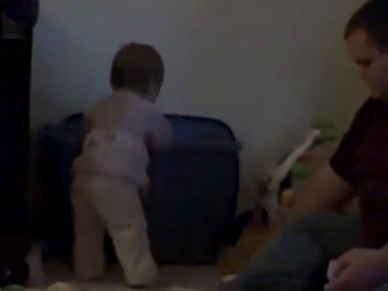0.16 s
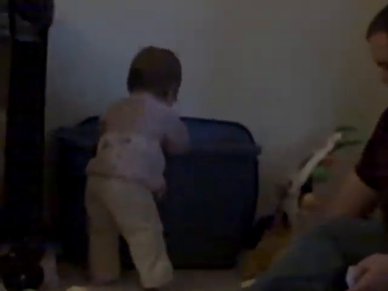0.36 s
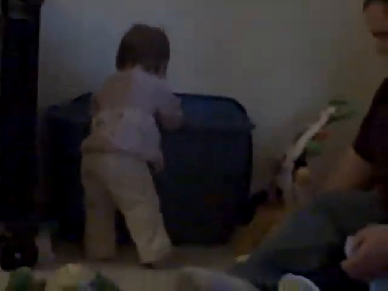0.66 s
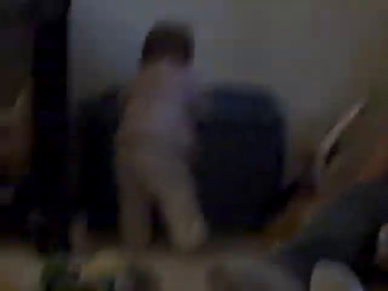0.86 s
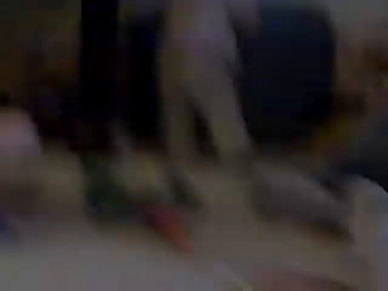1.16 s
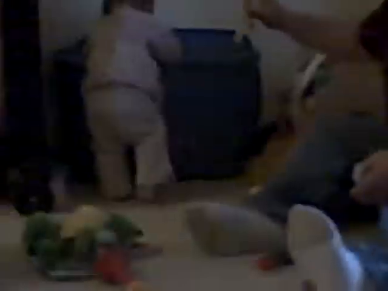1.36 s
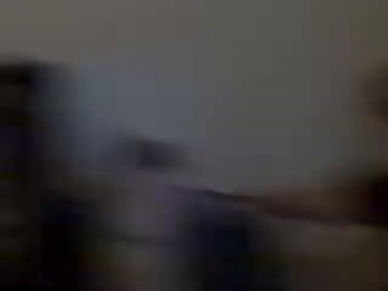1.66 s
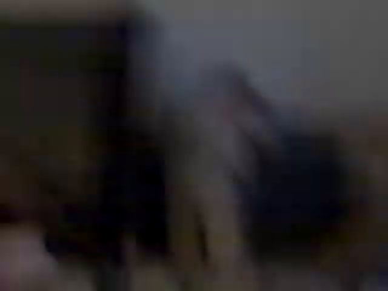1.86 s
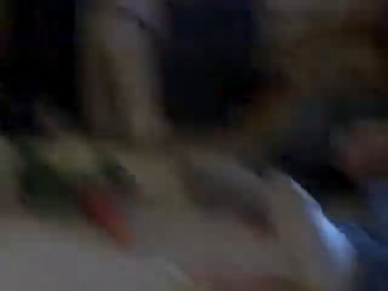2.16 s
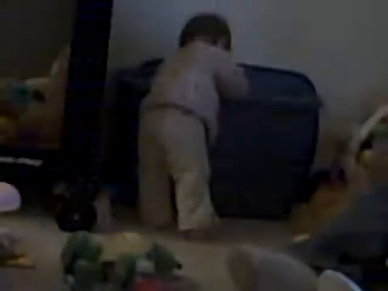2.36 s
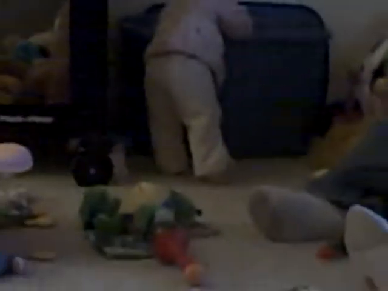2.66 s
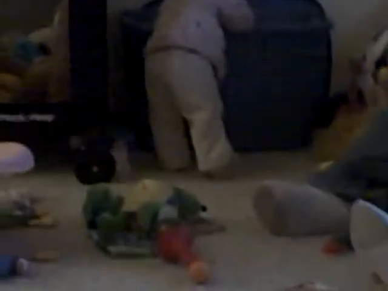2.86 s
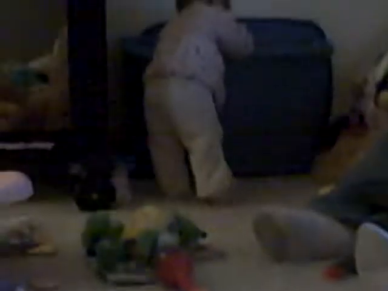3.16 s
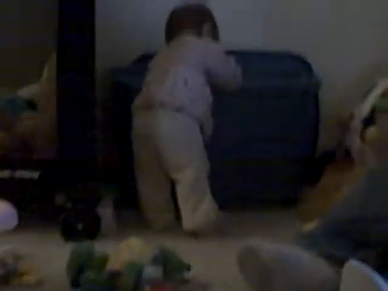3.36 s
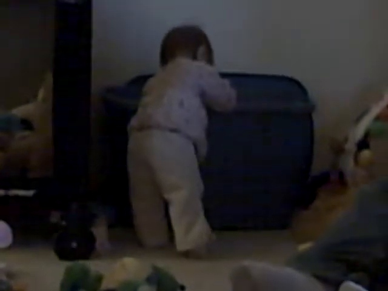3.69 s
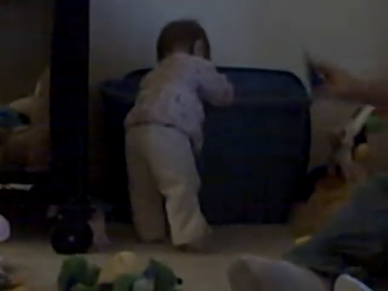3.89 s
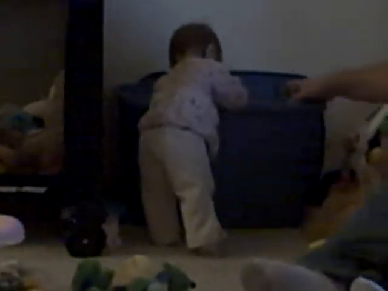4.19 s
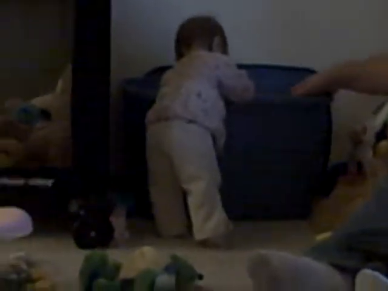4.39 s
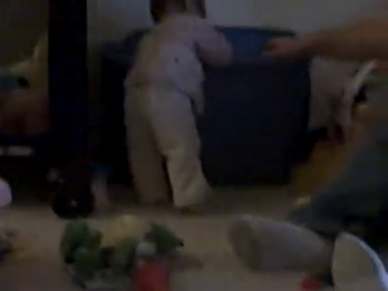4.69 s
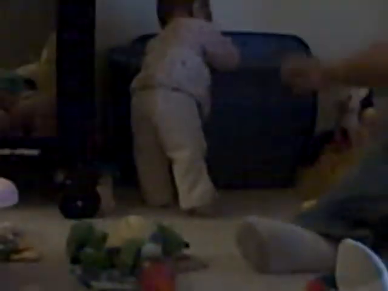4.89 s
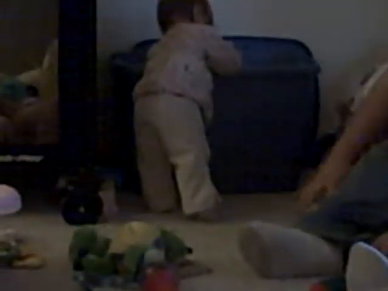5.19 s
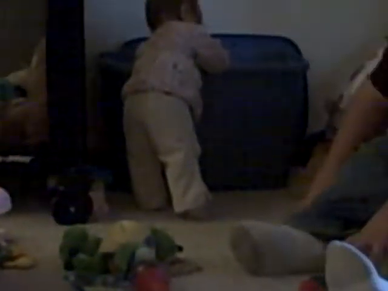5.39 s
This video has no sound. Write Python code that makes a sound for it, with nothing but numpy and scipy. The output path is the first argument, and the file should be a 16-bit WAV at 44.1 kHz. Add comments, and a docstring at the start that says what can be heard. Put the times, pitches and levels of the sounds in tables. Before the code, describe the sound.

Hard plastic toys knock and clatter in a big hollow plastic bin in bursts, with handling ticks, in a quiet humming living room.

```python
"""Hard plastic toys knock and tinkle as they are pushed about and dropped into a big plastic bin.
Each knock is a short rattle of contacts that rings a toy; a soft push makes the bin walls boom.
Small parts ring high and thin; rough held tones make squeaks and one hollow bong; fingers tick on the
hand-held recorder. Hands rustle as shaped noise; a quiet carpeted living room adds short echoes.
Mains hum, two thin whines and microphone hiss lie underneath."""
import sys
import numpy as np
from scipy import signal
from scipy.fft import rfft, irfft
from scipy.io import wavfile
from scipy.ndimage import uniform_filter1d

SR = 44100
rng = np.random.default_rng(int(sys.argv[2]) if len(sys.argv) > 2 else 0)


def master_out(mix):
    """Clip the mix to full scale and print it as 16-bit PCM to the path in sys.argv[1]."""
    frames = np.transpose(np.atleast_2d(mix))
    ceiling = np.clip(frames, -1, 1)
    pcm = np.round(ceiling * 32767).astype(np.int16)
    wavfile.write(sys.argv[1], SR, pcm)


def voltage_ratio(level):
    """Linear amplitude factor for a level in decibels (scalar or array-like)."""
    return 10 ** (np.asarray(level, float) / 20)


N = 244314  # samples
T = np.arange(N) / SR  # s

# Source levels are set ahead of the tone shaping and the room.
# toy knocks: t/s, level/dB, treble over that level/dB, ring f/Hz, rattle decay/s
TOY_KNOCKS = [(0.021, -46.5, 13.5, 2920, 0.008), (0.057, -46.5, 8, 3200, 0.058),
              (0.081, -33, -20, 1340, 0.0076), (0.202, -46, 6, 4830, 0.018),
              (0.219, -35.5, -24, 644, 0.021), (0.424, -41, -14, 1190, 0.0016),
              (0.44, -66, 20, 3360, 0.0059), (0.458, -39, -8, 1240, 0.0064), (0.489, -41, -19, 1770, 0.004),
              (1.76, -37.5, 9.5, 5150, 0.0078), (1.77, -22, -3.5, 766, 0.025),
              (1.774, -23.5, 2, 2150, 0.0048), (1.798, -23, 0, 765, 0.025), (1.825, -27.5, -1, 575, 0.013),
              (1.964, -34, -25.5, 1000, 0.018), (1.981, -32.5, 8.5, 4440, 0.026), (2, -29, 10, 5400, 0.011),
              (2.036, -30, 6.5, 657, 0.033), (2.065, -23.5, -21, 846, 0.0055),
              (2.089, -28, -2.5, 760, 0.014), (2.12, -29.5, 3.5, 866, 0.01),
              (2.2417, -30, -6, 1650, 0.0054), (2.25, -29, -8, 653, 0.012), (2.271, -41, -23, 1550, 0.0071),
              (2.284, -28.5, -5, 1680, 0.0033), (2.289, -26, -8, 710, 0.011),
              (2.339, -27, -11.5, 996, 0.013), (2.375, -39, -24, 1180, 0.011),
              (2.405, -44.5, -1, 730, 0.014), (2.484, -40.5, -10.5, 780, 0.0091),
              (2.534, -41.5, -9.5, 934, 0.036), (2.61, -43.5, -10, 804, 0.017),
              (2.803, -51, -28, 964, 0.0074), (3.049, -41.5, -26, 947, 0.0094),
              (4.203, -58.5, -1, 1350, 0.015), (4.46, -49, -6, 1770, 0.01),
              (4.524, -38.5, 1.5, 1140, 0.015), (4.554, -51.5, 17, 6300, 0.007),
              (4.595, -34.5, -20, 1900, 0.002), (5.301, -31.5, -19, 590, 0.0032),
              (5.306, -39.5, -3, 1620, 0.0038), (5.315, -36, -30, 727, 0.008),
              (5.33, -42.5, -27, 940, 0.0086), (5.383, -52, 0.5, 700, 0.015)]
# small parts and lightly knocked toys ringing out: t/s, level/dB, f/Hz
LONE_RINGS = [(0.02, -24, 12100), (.022, -29, 15200), (.052, -45, 3590), (.06, -42, 3230),
              (.075, -38.5, 12700), (0.128, -36.5, 10060), (.13, -47, 3650), (.15, -33, 7720),
              (.15, -38, 15100), (.205, -36, 7830), (0.235, -43, 11170), (.265, -41, 7650),
              (0.444, -46, 5540), (.445, -44.5, 3180), (.477, -45.5, 1206), (3.15, -46, 1256),
              (.085, -39, 1970), (1.761, -27.5, 4890), (1.797, -22, 3270), (1.85, -32, 3170),
              (2.007, -27, 3904), (4.535, -41.5, 6460), (.151, -43, 13000), (.205, -41, 15000)]
# blows on the toy that is dropped in: t/s, level/dB, rattle decay/s
DROP_BLOWS = [(4.593, -31, 0.064), (4.622, -38, 0.0016), (4.642, -17, 0.012), (4.648, -19.5, 0.024),
              (4.669, -31, 0.011), (4.71, -29.5, 0.024), (4.769, -36, 0.028)]
# modes of the dropped toy, before blow strength tilts them: f/Hz, level/dB, t60/s
DROPPED_MODES = [(1010, -10.5, 0.2), (1042, -9.5, 0.19), (1775, -21, 0.34), (2048, -15.5, 0.34),
                 (2342, -15.5, 0.66), (3385, -7.5, 0.075), (3970, -22, 0.33), (4334, -32, 0.27),
                 (4970, -26, 0.22), (5300, -25, 0.2), (5400, -13, 0.17), (6220, -9, 0.17),
                 (7900, -25, 0.15), (9070, -19, 0.14), (10400, -15, 0.11)]
# blows on the hollow toy: t/s, level/dB, rattle decay/s
HOLLOW_BLOWS = [(2.93, -30, 0.012), (2.946, -29.5, 0.0058), (2.958, -33, 0.0049)]
# modes of the hollow toy, before blow strength tilts them: f/Hz, level/dB, t60/s
HOLLOW_MODES = [(617, -17, 0.11), (1120, -14, 0.091), (1147, -9.5, 0.13), (1185, 0.5, 0.22),
                (1706, -12.5, 0.043), (2335, -1, 0.029), (2670, -7, 0.018), (3560, -8, 0.042),
                (3950, -7, .03), (5200, -5, 0.029), (5860, -10, .02)]
# pushes on the bin: t/s, level/dB, nearest wall f/Hz, its t60/s (hands and toys damp it)
BIN_PUSHES = [(.009, -37, 172, 0.028), (0.076, -28.5, 212, 0.024), (0.217, -32, 217, 0.018),
              (1.796, -21, 280, 0.084), (1.819, -21.5, 169, 0.066), (1.964, -29, 262, 0.079),
              (2.033, -29, 148.5, 0.1), (2.049, -41, 88, 0.11), (2.064, -30, 155.3, 0.085),
              (2.095, -31, 211, 0.056), (2.2425, -25, 229, 0.011), (2.289, -38.5, 233, 0.12),
              (2.349, -39.5, 212, 0.16), (2.532, -36.5, 241, 0.044), (2.795, -49, 166, 0.068),
              (3.046, -46, 220, 0.047), (4.463, -42, 290, 0.025), (4.593, -31.5, 251, 0.032),
              (4.644, -24, 160, 0.095), (4.66, -31, 93.5, 0.11), (4.753, -31.5, 151, 0.098),
              (5.036, -40.5, 273, 0.075), (5.039, -42.5, 96, 0.074), (5.146, -37.5, 276, 0.093),
              (5.299, -25, 237, 0.007), (5.32, -41, 232, 0.07), (5.362, -53, 264, 0.12)]
# balance of the other bin walls: f/Hz, level/dB, t60/s
WALL_MODES = [(98, -14, 0.15), (133, 5.5, 0.024), (160, -2, 0.45), (212, 10.5, 0.053), (279, 4.5, 0.13),
              (346, 1, 0.074)]
# held tones, rubbed toys that squeak and one hollow bong of a bin wall:
# t/s, length/s, tone level/dB, start f/Hz, end f/Hz
HELD_TONES = [(0.156, 0.15, -60, 2870, 2850), (0.247, 0.1, -54, 881, 876), (0.356, 0.067, -46.5, 870, 877),
              (0.485, 0.063, -33.5, 212, 200), (1.6, 0.08, -58, 995, 1205), (3.054, 0.065, -58, 934, 796),
              (3.108, 0.053, -57, 850, 1323)]
# fingers on the recorder case: t/s, level/dB, treble and thud relative to it/dB, ring f/Hz
FINGER_TICKS = [(0.659, -39, -37, -27, 800), (0.824, -23.5, -1.5, -27, 1500), (1.022, -41, -3.5, -11, 1010),
                (1.081, -44, -16, -18, 1040), (1.097, -37, -8, -4.5, 970), (1.135, -42.5, -12, 1, 950),
                (1.165, -48, 1.5, -5, 1150), (1.192, -44, -20, -6, 940), (1.216, -38.5, -27, -5, 1220),
                (1.28, -39, 8.5, -3, 715), (1.542, -45, 3.5, 0, 1900), (1.649, -41, -8.5, -5, 1020),
                (1.683, -39, -3.5, -9, 700), (2.202, -46, 22.5, -19, 4200), (2.218, -43, 21.5, -23, 4000)]
# modes of the recorder case, before tap strength shifts them: f/Hz, level/dB, t60/s
CASE_MODES = [(555, -16, 0.03), (870, -3, 0.019), (2240, -11, .01), (3530, -8.5, 0.0083), (8200, -15, .008)]
# hands moving among the toys: t/s, level/dB
HAND_LEVEL = [(0, -57), (.3, -62), (.55, -63.5), (.95, -63.5), (1.1, -68.5), (1.42, -77), (1.74, -69),
              (1.95, -55), (2.2, -53.5), (2.45, -63.5), (2.7, -70.5), (3.05, -65), (3.5, -75), (4.44, -75),
              (4.51, -62), (4.7, -43), (4.86, -66.5), (5.02, -69), (5.25, -63.5), (5.54, -68.5)]
# cloth and sleeves brushing past: centre t/s, middle level/dB, treble level/dB, fall/(dB per s)
CLOTH_BRUSHES = [(.24, -87, -55, 120), (1.277, -69.5, -53.5, 101), (1.54, -86, -65, 350),
                 (1.73, -88, -57.5, 170), (2.2, -72, -57, 97), (3.129, -58, -67, 179),
                 (4.556, -77, -46, 418)]
# tone curve of brushed cloth: f/Hz, level/dB
CLOTH_TONE = [(2000, -29), (4000, -0.5), (8500, 1), (11500, 1), (15500, 4)]
# echo decay of the room: f/Hz, t60/s
ROOM_DECAY = [(125, 0.39), (500, 0.3), (2000, 0.27), (6000, 0.28), (14000, 0.087)]
# tone curve of room air and hiss: f/Hz, relative level/dB
AIR_TONE = [(15, -8), (25, -3), (70, -6.5), (121, -3.5), (142, -12), (167, -8.5), (457, -32.5), (2210, -28),
            (8600, -33), (15650, -35), (15900, -60)]
# thin whines, before they flicker: f/Hz, level/dB
WHINE_TONES = [(11230, -83.5), (15272, -85)]


def unit(x):
    """Scale to rms 1."""
    return x / np.sqrt(np.mean(x ** 2))


def peak(x, db):
    """Scale to a peak level in dB."""
    return x * voltage_ratio(db) / np.max(np.abs(x))


def colour(x, points):
    """Filter by (Hz, dB) points joined on a log frequency axis."""
    hz, db = np.transpose(points)
    f = np.maximum(np.fft.rfftfreq(len(x), 1 / SR), 1)
    gain = voltage_ratio(np.interp(np.log(f), np.log(hz), db))
    return irfft(rfft(x) * gain, len(x))


def add(out, s, *parts):
    """Mix sounds in at time s."""
    i = int(s * SR)
    for x in parts:
        out[i:i + len(x)] += x[:N - i]


def rattle(decay_s, size=16384):
    """A burst of uneven tiny contacts that builds up quickly and dies away."""
    t = np.arange(size) / SR / max(decay_s, .0005)
    unevenness_db = 3.4 * np.repeat(rng.standard_normal(size // 32), 32)
    contacts = rng.standard_normal(size) * voltage_ratio(unevenness_db)
    return contacts * np.exp(-t) * (1 - np.exp(-t / 0.26))


def crack(burst, treble_db, middle_db=0):
    """The broadband part of a knock: a middle and a treble band with their own random peaks and dips."""
    patches_db = 2.2 * rng.standard_normal(48)
    burst = colour(burst, list(zip(np.geomspace(400, 16000, num=48), patches_db)))
    middle = colour(burst, [(150, 9.5), (450, -1.5), (1200, 11.5), (2500, 4.5), (5000, -21.0)])
    treble = colour(burst, [(1800, -18), (3500, 7.5), (8000, 5.0), (16000, -4)])
    return (peak(middle, middle_db) + peak(treble, treble_db))[:len(burst) * 3 // 4]


def ring(x, hz, t60):
    """One decaying mode struck by x: a complex one-pole resonator."""
    pole = np.exp(2j * np.pi * hz / SR - np.log(1000) / (max(t60, .004) * SR))
    return signal.lfilter([1], [1, -pole], x).imag


def rough_ring(burst, hz, t60, db):
    """A close pair of modes that beat against each other; the upper one dies sooner."""
    lower = peak(ring(burst, hz, t60), 0)
    upper = peak(ring(burst, hz * 1.008 + 20, t60 * 0.49), -0.71)
    return peak(lower + upper, db)


def knocks():
    """Every knock cracks and rings its own toy in one short mode pair."""
    toy_t60_s, ring_under_peak_db = 0.021, -3
    out = np.zeros(N)
    for s, db, treble_db, hz, decay_s in TOY_KNOCKS:
        burst = rattle(decay_s)
        tone = rough_ring(burst, hz, toy_t60_s, db + ring_under_peak_db)
        add(out, s, voltage_ratio(db) * crack(burst, treble_db), tone)
    return out


def tinkles():
    """Small parts and lightly knocked toys ring on after a brief rattle; high ones die away sooner."""
    t60_at_1khz_s, t60_slope = 0.2, -0.97  # the slope is an exponent over pitch
    out = np.zeros(N)
    for s, db, hz in LONE_RINGS:
        t60 = t60_at_1khz_s * (hz / 1000) ** t60_slope
        add(out, s, rough_ring(rattle(0.0073), hz, t60, db))
    return out


def strike(blows, modes, crack_db, treble_db):
    """Blows on one toy ring all its modes, duller when struck softly."""
    out = np.zeros(N)
    for s, db, decay_s in blows:
        burst = rattle(decay_s)
        tilt_db = 0.17 * db  # per octave above 1 kHz
        rings = sum(rough_ring(burst, hz, t60, g + tilt_db * np.log2(hz / 1000)) for hz, g, t60 in modes)
        add(out, s, voltage_ratio(db) * rings, voltage_ratio(db) * crack(burst, treble_db + .5 * db, crack_db))
    return out


def toys():
    """Knocks, tinkles and two many-moded toys, with the bass filtered out."""
    dropped = strike(DROP_BLOWS, DROPPED_MODES, crack_db=-5, treble_db=14)
    hollow = strike(HOLLOW_BLOWS, HOLLOW_MODES, crack_db=-28, treble_db=16)
    return colour(knocks() + tinkles() + dropped + hollow, [(100, -23.0), (300, -0.5)])


def bin_walls():
    """A soft push swings the nearest wall and stirs all the others."""
    push_s = 0.0109
    others_db, others_slope_db = -2, 2.5  # at a nearest-wall t60 of 0.1 s; per doubling of it
    out, t = np.zeros(N), np.arange(16384) / SR
    for s, db, hz, t60 in BIN_PUSHES:
        push = np.sin(2 * np.pi * hz * t) * (t < push_s)
        nearest = peak(ring(push, hz, t60), db)
        others = sum(peak(ring(rattle(0.013), f, d), g) for f, g, d in WALL_MODES)
        stirred_db = db + others_db + others_slope_db * np.log2(10 * t60)
        add(out, s, nearest + peak(others, stirred_db))
    return colour(out, [(30, -41), (75, -4.0), (120, -2.5), (400, -3.5), (1500, -15)])


def held_tone(length_s, start_hz, end_hz):
    """One gliding tone, roughened by slow random judder in and out of phase with it."""
    attack_s, release_s, roughness = 0.0018, 0.026, 0.46
    judder_cycles = 3.5  # smoothing, in cycles of the start pitch
    t = np.arange(8192) / SR
    shape = np.clip(np.minimum(t / attack_s, (length_s - t) / release_s), 0, 1)
    hz = np.interp(t, [0, length_s], [start_hz, end_hz])
    phase = 2 * np.pi * np.cumsum(hz) / SR
    noise = rng.standard_normal((2, len(t)))
    judder = roughness * unit(uniform_filter1d(noise, int(judder_cycles * SR / start_hz)))
    return shape * ((1 + judder[0]) * np.sin(phase) + judder[1] * np.cos(phase))


def held_tones():
    """Held tones: rubbed toys squeak, and one hollow bong of a bin wall."""
    out = np.zeros(N)
    for s, length_s, db, start_hz, end_hz in HELD_TONES:
        add(out, s, voltage_ratio(db) * held_tone(length_s, start_hz, end_hz))
    return out


def fingers():
    """Dry ticks and thuds carried by the case to the microphone; firm taps wake more of its modes."""
    out, t = np.zeros(N), np.arange(4096) / SR
    for s, db, treble_db, thud_db, hz in FINGER_TICKS:
        burst = rattle(0.0018, size=4096)
        thud = -np.sin(2 * np.pi * 70 * t) * np.exp(-t / 0.0019)
        firmness_db = 0.69 * (db + 16.5)
        case = sum(peak(ring(burst, f, d), g + firmness_db) for f, g, d in CASE_MODES)
        tick = voltage_ratio(db) * (crack(burst, treble_db, -4) + case[:3072])
        add(out, s, tick, peak(ring(burst, hz, 0.01), db - 3), peak(thud, db + thud_db))
    return out


def rustle():
    """Grainy rubbing noise with a shared flutter; treble and bin rumble follow its level, brushes swell."""
    pivot_db = -60
    treble_db, treble_slope = -65, 1.33  # level at the pivot; dB per dB of rustle
    rumble_db, rumble_slope = -60, 0.75
    level_db = np.interp(T, *np.transpose(HAND_LEVEL))
    over_db = level_db - pivot_db
    brush_middle, brush_treble = np.zeros(N), np.zeros(N)
    for s, m_db, t_db, fall in CLOTH_BRUSHES:
        swell = voltage_ratio(-fall * np.abs(T - s))
        brush_middle += swell * voltage_ratio(m_db)
        brush_treble += swell * voltage_ratio(t_db)
    wander = uniform_filter1d(uniform_filter1d(rng.standard_normal(N), 300), 300)
    noise = rng.standard_normal(N) * voltage_ratio(2.0 * unit(wander))  # flutter of 2 dB rms
    middle = unit(colour(noise, [(200, -33), (450, -4.0), (1200, 3), (3000, -7.5), (5000, -64.0)]))
    treble = unit(colour(noise, [(2000, -37), (3500, 7.0), (9000, -4.5), (16000, -9.0)]))
    rumble = unit(colour(noise, [(25, -22), (60, -15.0), (160, -4.5), (300, -6.5), (600, -15), (2000, -70)]))
    cloth = unit(colour(noise, CLOTH_TONE))
    return ((voltage_ratio(level_db) + brush_middle) * middle
            + voltage_ratio(treble_db + treble_slope * over_db) * treble
            + voltage_ratio(rumble_db + rumble_slope * over_db) * rumble
            + brush_treble * cloth)


def echoes(x):
    """Diffuse room echoes: noise bands half an octave apart, each dying at its own rate."""
    room_db = -8
    t, tail = np.arange(SR // 2) / SR, 0
    hz, t60 = np.transpose(ROOM_DECAY)
    for f in 60 * 2 ** np.arange(0, 8.1, .5):
        band_shape = [(f / 2, -60), (f / 2 ** .5, -20), (f, 0), (f * 2 ** .5, -20), (f * 2, -60)]
        band = colour(rng.standard_normal(len(t)), band_shape)
        band_t60 = np.interp(np.log(f), np.log(hz), t60)
        tail = tail + band * np.exp(-np.log(1000) * t / band_t60)
    tail = tail * np.clip((t - .003) / 0.00037, 0, 1)  # the first 3 ms stay empty
    tail = tail / np.sqrt(np.sum(tail ** 2))
    return voltage_ratio(room_db) * signal.fftconvolve(x, tail)[:N]


def quiet():
    """Room tone and hiss, a slightly wavering hum and two thin, flickering whines."""
    hum_hz, hum_width_hz, hum_db = 118.8, 4, -62.5
    air = voltage_ratio(-64) * unit(colour(rng.standard_normal(N), AIR_TONE))
    waver = unit(ring(rng.standard_normal(N), hum_hz, 3.2 / hum_width_hz))  # narrow-band noise
    hum = voltage_ratio(hum_db) * (np.sin(2 * np.pi * hum_hz * T) + 0.1 * waver)
    flicker = voltage_ratio(3.5 * unit(uniform_filter1d(rng.standard_normal(N), 2000)))  # 3.5 dB rms
    whines = sum(voltage_ratio(db) * np.sin(2 * np.pi * hz * T) for hz, db in WHINE_TONES)
    return air + hum + flicker * whines


def scene():
    """Toys and bin sound in the room; the held tones stir it less; fingers, rustle and hum are direct."""
    struck = toys() + bin_walls()
    held = held_tones()
    in_room = struck + echoes(struck) + held + voltage_ratio(-10) * echoes(held)
    return (in_room + fingers() + rustle() + quiet())[None]  # one channel


def band_limit(x):
    """A steep low-pass at the top of the band."""
    return signal.sosfilt(signal.butter(12, 16990, fs=SR, output="sos"), x)


def record(dry):
    """The recorder cuts the top with a steep low-pass at 15.9 kHz."""
    low_pass = signal.ellip(8, .2, 40, 15900, fs=SR, output="sos")
    mix = signal.sosfilt(low_pass, dry)
    return band_limit(mix)


dry = scene()
out = record(dry)
master_out(out)
```